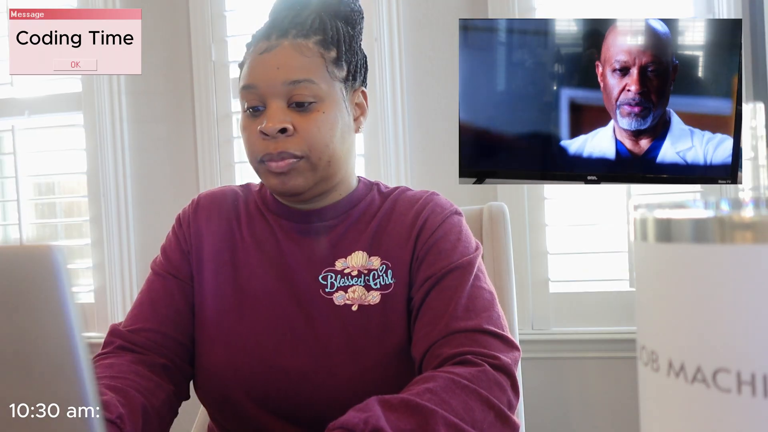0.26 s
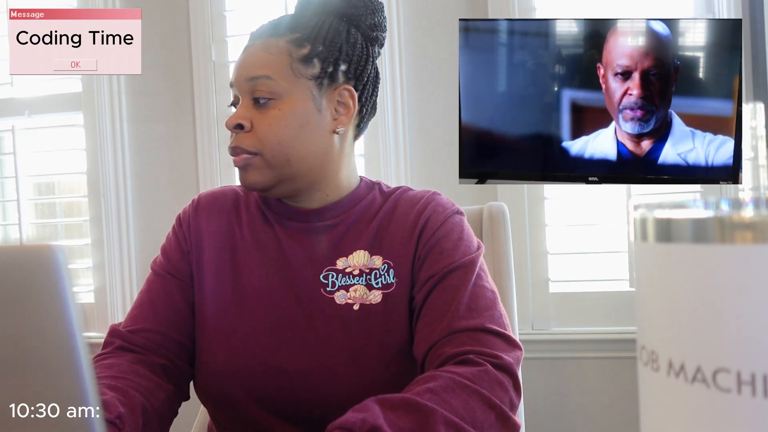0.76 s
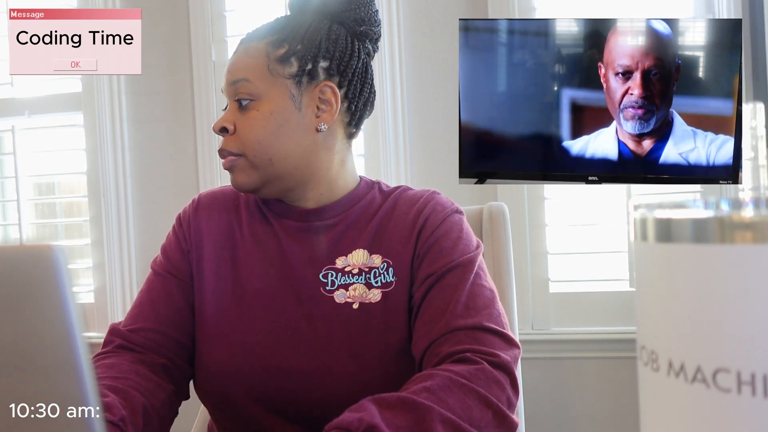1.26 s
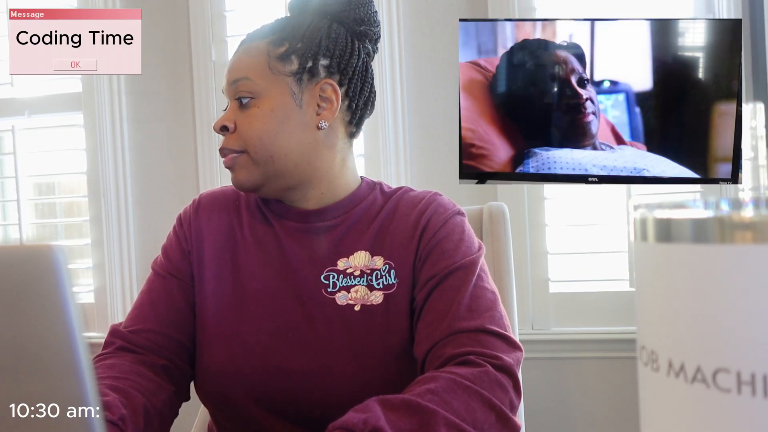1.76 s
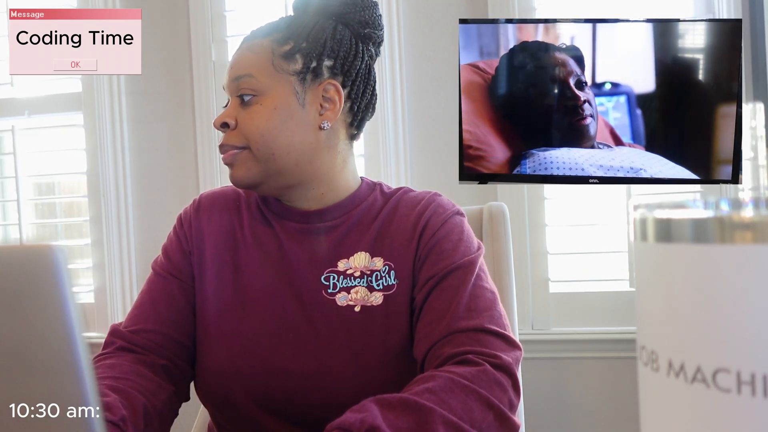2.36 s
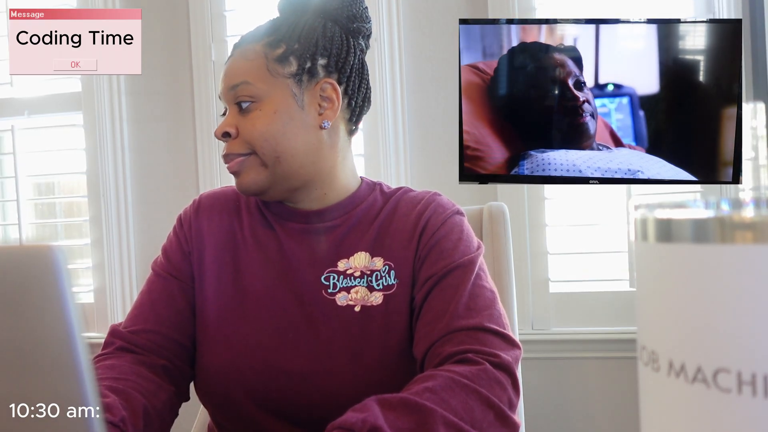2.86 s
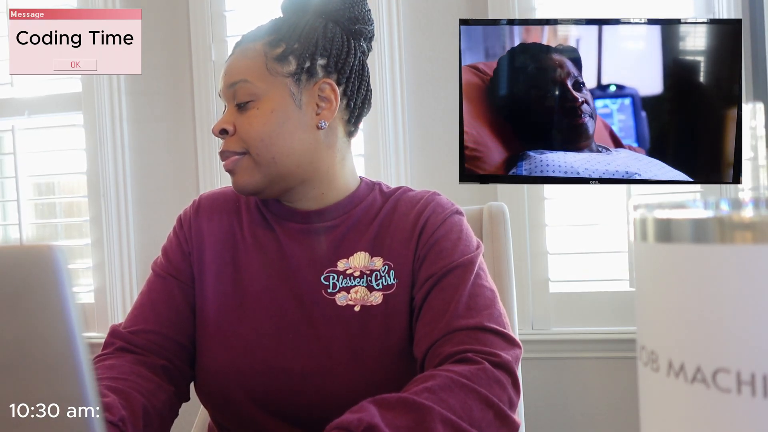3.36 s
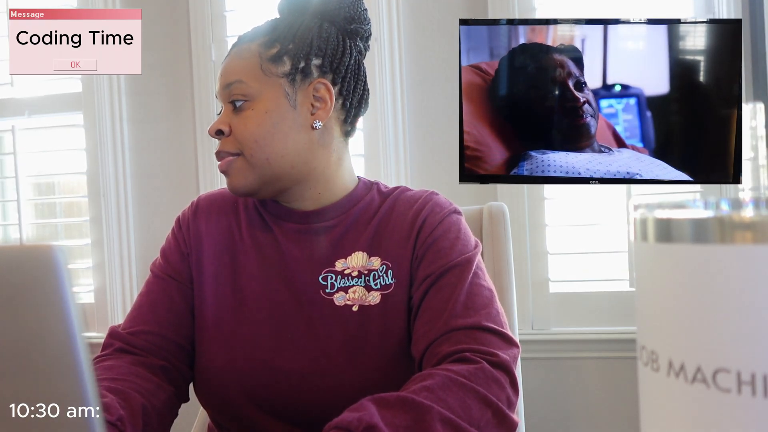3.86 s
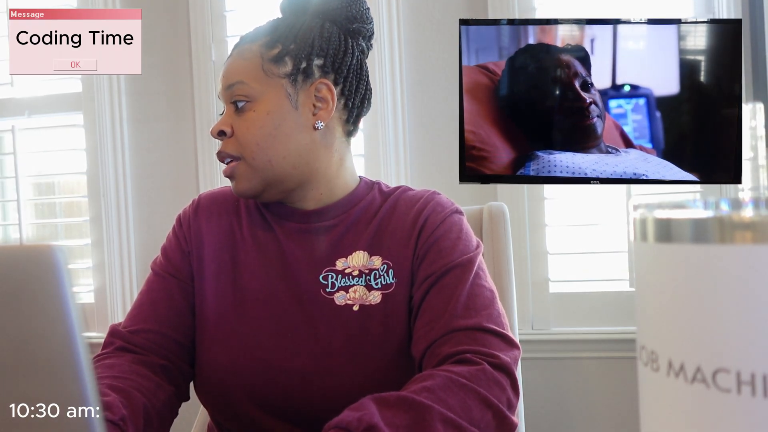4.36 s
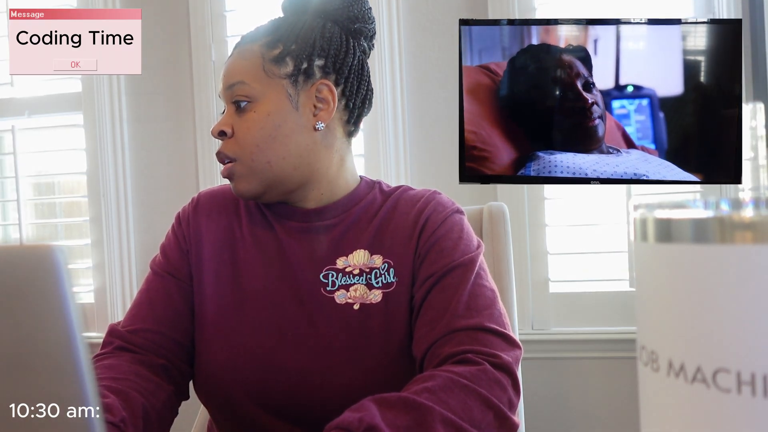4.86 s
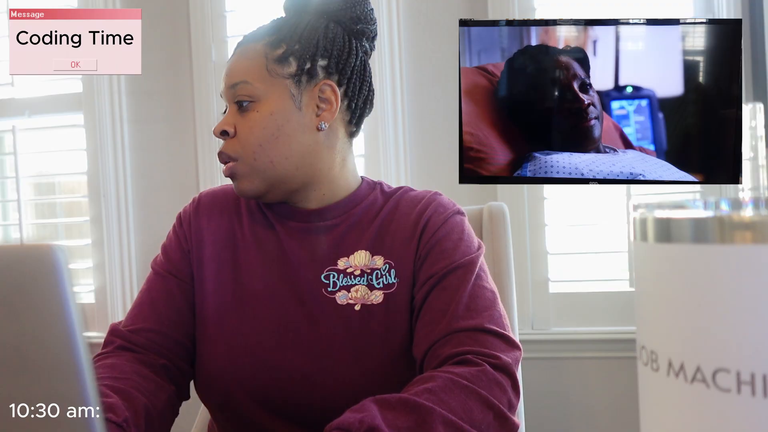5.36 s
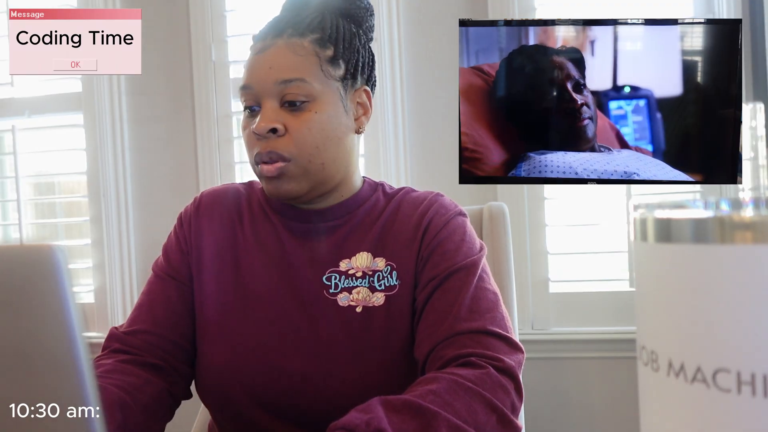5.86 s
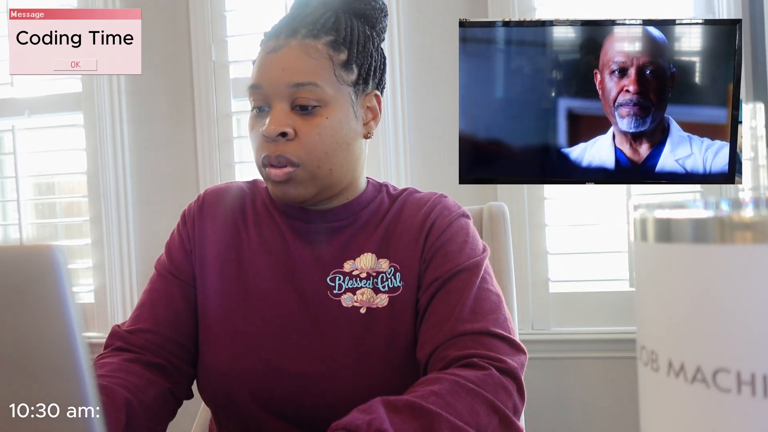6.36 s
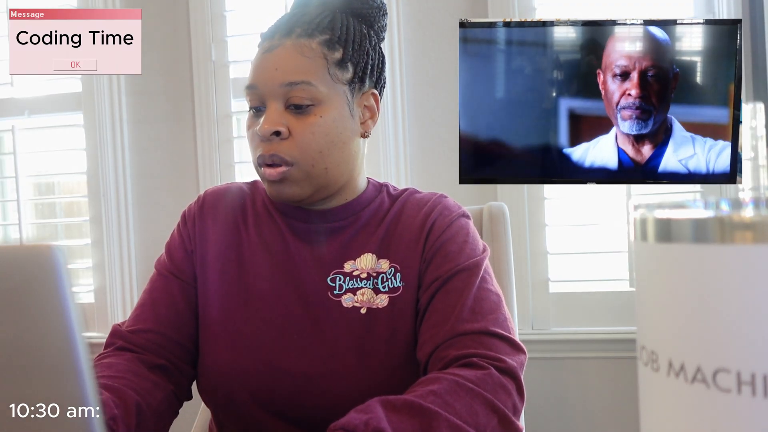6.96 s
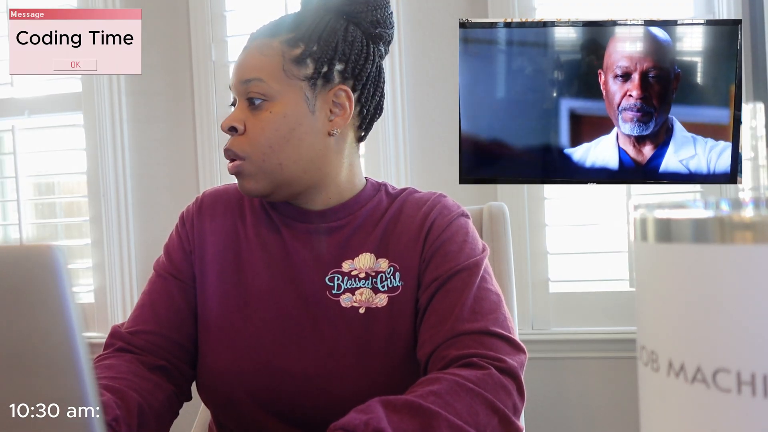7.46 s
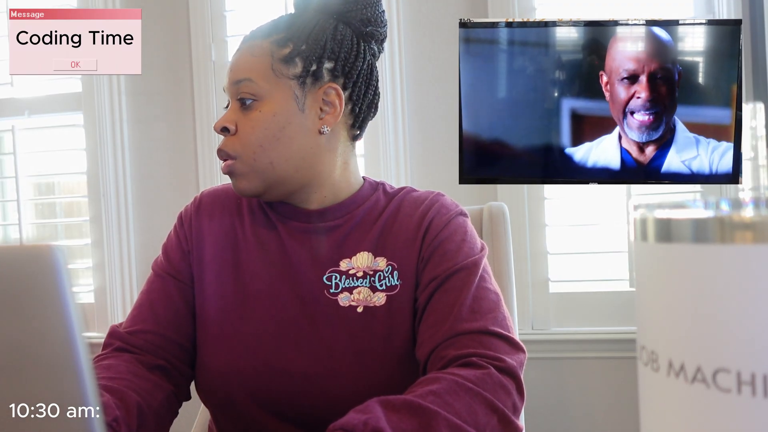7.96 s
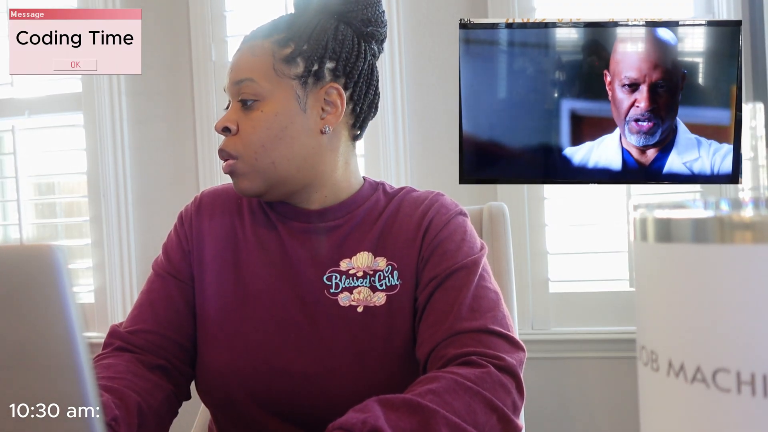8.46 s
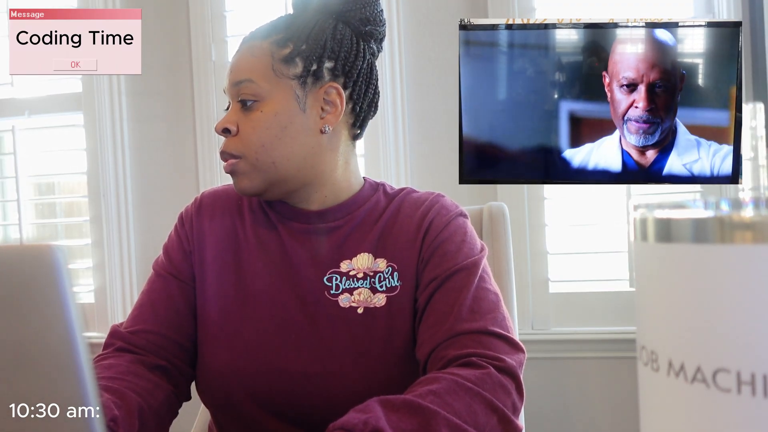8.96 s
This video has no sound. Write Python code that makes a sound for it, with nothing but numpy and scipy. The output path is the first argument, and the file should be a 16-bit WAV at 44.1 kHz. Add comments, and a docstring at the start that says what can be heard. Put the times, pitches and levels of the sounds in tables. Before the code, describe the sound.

Laptop typing, heard at short distance on a phone: short, dry, crisp taps with small low thuds from the case, each followed by a quick reflection off a near wall and a light room tail. Rapid bursts fill the first five seconds, strongest around the middle of that run. Afterwards come isolated strokes and pairs with longer gaps, then a slightly quicker handful. Soft airy hiss continues throughout.

```python
"""A quiet, hard-walled room: fingers type quick runs on a laptop keyboard, a little way from a phone.
Bright taps and dull knocks each start as a short rattle that rings the keycap, its hinge and the case.
A near wall returns them about 15 ms later, and the room carries them off in a tail of fading noise bands.
Under it all lies a soft fan hiss of shaped noise whose octave bands flicker slightly."""
import sys
import numpy as np
from scipy import signal
from scipy.fft import rfft, irfft, next_fast_len
from scipy.io import wavfile
from scipy.ndimage import uniform_filter1d

SR = 44100
rng = np.random.default_rng(int(sys.argv[2]) if len(sys.argv) > 2 else 0)


def dump(signal):
    """Clip the signal to [-1, 1] and save it as 16-bit WAV at the path in sys.argv[1]."""
    limited = np.clip(np.atleast_2d(signal).T, -1, 1)
    pcm = np.round(limited * 32767).astype(np.int16)
    wavfile.write(sys.argv[1], SR, pcm)


N = 406161

# stereo width of the typing, near and off the walls: (frequency [Hz], side minus mid [dB])
WIDTH = [(100, -18), (500, -11.5), (2000, -17), (4000, -10), (10000, -7.5)]


def contacts():
    """Fingers tap and keys land: rows of (time, level, case, hinge, cap Hz, hinge Hz, case Hz, top Hz, room dB)."""
    # bright taps of nail and keycap: (time [s], nominal peak [dB], case above cap [dB],
    # hinge above cap [dB], cap pitch [Hz], hinge pitch [Hz])
    taps = [(0.24, -32.0, -12, -5.5, 5100, 8200), (0.415, -28.5, -6, -5, 2040, 8100),
            (0.441, -31, -11, -7, 1500, 9050), (0.581, -23, -13, 5, 4500, 7800),
            (0.606, -25.5, -10.5, -10, 1980, 7750), (0.691, -28, -10, -5, 3350, 7850),
            (0.751, -16.5, -18, -1, 5660, 6550), (0.846, -25, -8.5, 1.5, 3020, 7700),
            (0.965, -18, -14, 8.5, 2930, 7850), (1.071, -23.5, -16, -9, 4030, 8200),
            (1.077, -23, -20, 5, 4120, 9250), (1.23, -12.5, -22, 1.5, 4400, 8100),
            (1.41, -23.5, -18, -6, 5300, 7400), (1.744, -18.5, -15.5, -1, 3900, 7600),
            (1.834, -21, -17, -5.5, 3900, 7550), (1.924, -18, -8.5, 5.5, 4650, 8350),
            (2.077, -26, -25, 4, 3370, 9300), (2.217, -16.5, -33, 6, 3960, 8200),
            (2.249, -18, -13.5, -2, 1610, 8400), (2.33, -12.5, -11.5, 7, 2600, 6900),
            (2.401, -22, -19, -6, 4860, 8100), (2.452, -21, -30.0, -2, 2600, 6270),
            (2.497, -18, -13, -0.5, 2340, 8300), (2.541, -27, -6.5, 0, 1460, 9700),
            (2.625, -16, -17, -4, 5800, 7200), (2.705, -25, -13, 5, 4240, 8000),
            (2.737, -23, -8.5, -2, 1770, 7950), (2.872, -23, 2, -12, 2670, 8400),
            (2.874, -15, -7.5, -10, 1830, 8700), (2.933, -12, -12, 10.5, 4070, 9100),
            (3.06, -19.5, -6, -0.5, 1450, 7550), (3.196, -15, -12.5, 2, 3730, 7040),
            (3.296, -24.5, -9.5, 0.5, 4130, 6450), (3.459, -29.5, -12.5, 2, 1523, 7800),
            (3.543, -27.5, -13.5, -5, 3980, 6230), (3.811, -13.5, -18, -2.5, 2360, 7700),
            (3.938, -30, -24, -5.0, 3900, 7960), (4.01, -20.5, -16, 0.5, 2920, 9100),
            (4.135, -23.5, -14, 6.5, 3980, 7860), (4.171, -16.5, -16, -0.5, 5950, 10300),
            (4.255, -23, -15, -1, 5400, 8200), (4.293, -13.5, -42, 7, 4400, 8300),
            (4.305, -21.5, -14, -20, 2030, 7800), (4.383, -13.5, -10, -1, 5400, 7350),
            (4.448, -33, -34.0, -5, 3260, 9000), (4.485, -12, -18.5, 6, 4340, 8860),
            (4.502, -22.5, -11, -13, 1720, 8850), (4.578, -15, -14, 2, 3900, 7840),
            (4.664, -23.5, -12, -2.5, 4900, 6300), (4.755, -23, -14, 0, 5500, 7550),
            (4.882, -27.5, -12.5, -5, 3660, 10100), (4.896, -22.5, -9, 10, 2100, 9200),
            (4.988, -35.5, -5.5, -2.5, 1640, 9100), (5.112, -29, -12, 4, 2300, 9000),
            (5.436, -34, -17, -9, 2150, 8500), (5.646, -34, -28, -11, 5650, 6200),
            (6.249, -20.5, -16.5, 0, 2020, 8200), (6.326, -28.5, -11.5, -11, 1560, 8500),
            (6.589, -26.5, -28, 2, 2170, 7500), (6.772, -26.5, -8, 3.5, 4200, 8050),
            (7.179, -39.5, -20, -8, 2050, 8700), (7.797, -25.5, -10, -2, 1810, 7800),
            (8.132, -38.5, -26, 0, 2050, 9500), (8.359, -23, -22, 4.5, 3300, 8500),
            (8.596, -38.5, -15.5, -7, 5440, 8750), (8.853, -23.5, -35, -4, 2900, 6640),
            (8.878, -28.5, -11, -2, 1650, 6270), (8.966, -24.5, -17, -2, 5660, 6400)]
    # dull knocks of keys landing on the case: (time [s], nominal peak [dB], case above cap [dB],
    # cap pitch [Hz], case pitch [Hz])
    knocks = [(0.003, -29, -31, 2580, 1160), (0.267, -30, -4, 2200, 930), (0.525, -35.5, 0, 2080, 905),
              (0.996, -25, -12.5, 2420, 1090), (1.099, -30.5, 2.5, 1400, 1030),
              (1.16, -35.5, -6.5, 2430, 1010), (1.241, -21, -20, 1580, 1300),
              (1.33, -28.5, -13, 2070, 1140), (1.557, -30.5, -12, 3400, 860),
              (2.013, -29.5, -13, 4200, 670), (2.096, -28.5, 2, 1630, 1020), (2.178, -35, 6, 2040, 1020),
              (2.307, -25, -14, 1540, 1120), (2.595, -22.5, -9, 2240, 1130), (2.953, -19, -5.5, 2560, 1070),
              (3.027, -23, 0, 1960, 980), (3.137, -32, 1, 1580, 900), (3.665, -32.5, 2, 1740, 1070),
              (3.681, -27.5, -10, 1830, 1080), (4.79, -25, -9.5, 1800, 1090),
              (4.919, -24.5, -2.5, 1590, 900), (5.136, -34.5, -4, 2050, 1100), (5.689, -38, -18, 1720, 680),
              (6.602, -23, -10.5, 1190, 930), (6.666, -33, -5, 3100, 870), (7.565, -29, -23, 3430, 1120),
              (7.844, -41, 13, 2130, 670), (8.205, -28, 0.5, 2130, 1070), (8.256, -26.5, -3.5, 1900, 1090),
              (8.376, -25.5, -2.5, 3320, 920), (8.45, -35.5, -9, 4280, 900),
              (8.706, -35.5, -15, 2500, 1230)]
    # the cap's ring dulls above the top frequency; the room share is what goes out to the walls
    tap_top_hz, tap_room_db = 9000, -1.5
    knock_top_hz, knock_room_db = 3670, -2
    knock_hinge_db, knock_hinge_hz = -13.5, 8300
    # the case pitch cycles through three values from tap to tap
    tap_case_hz = np.resize((1090, 1180, 1020), len(taps))
    rows = [(*tap, case_hz, tap_top_hz, tap_room_db) for tap, case_hz in zip(taps, tap_case_hz)]
    for s, peak_db, case_db, cap_hz, case_hz in knocks:
        rows.append((s, peak_db, case_db, knock_hinge_db, cap_hz, knock_hinge_hz,
                     case_hz, knock_top_hz, knock_room_db))
    return np.array(rows, float)


def keys(size=4096):
    """Rattles ring cap, case and hinge; gives the direct sound (mid, side) and the sends to the room."""
    # modes of the case, the lowest a faint ring of the desk beneath: (mean centre [Hz], width [Hz], mean level
    # [dB])
    case_modes = [(260, 45, -24), (507.5, 43, -5.5), (649, 66, -4), (896, 262, -3), (1155, 197, -2.5)]
    # modes of the deck that ring with the cap: (mean centre [Hz], width [Hz], mean level [dB])
    deck_modes = [(1714, 480, -3.5), (2436, 570, -2), (3820, 580, -0.5), (5240, 920, 0)]
    # modes of the hinge: (mean centre [Hz], width [Hz], mean level [dB])
    hinge_modes = [(7940, 1480, -11.5), (10250, 1700, -13), (13900, 690, -8)]
    # each contact lifts the modes near its own pitches; gains are heights over the plain modes
    cap_width_hz, cap_gain = 400, 1.54
    case_width_hz, case_gain = 154, 2.15
    hinge_width_hz, hinge_gain = 1340, 3.04
    crest_db = 10.5  # nominal peak over the loudest two milliseconds
    sends = 6  # the contacts take turns among these, so the tails vary
    columns = contacts().T[:, :, None]
    s, peak_db, case_db, hinge_db, cap_hz, hinge_hz, case_hz, top_hz, room_db = columns
    count, hz = len(s), bins(size)
    lead = int(.002 * SR)  # room ahead of the contact for the rings' responses
    rattle = rattles(count, size) * np.exp(-2j * np.pi * hz * lead / SR)

    cap = abs(1 + cap_gain * ring(hz, cap_hz, cap_width_hz)) * body(deck_modes, hz, count, dense=True)
    cap = cap / (1 + (hz / top_hz) ** 2)
    case = (1 + case_gain * ring(hz, case_hz, case_width_hz)) * body(case_modes, hz, count)
    hinge = abs(1 + hinge_gain * ring(hz, hinge_hz, hinge_width_hz))
    hinge = hinge * body(hinge_modes, hz, count, dense=True)

    sound = 0
    for response, db, span_ms in ((case, case_db, 8), (cap, 0, 3), (hinge, hinge_db, 3)):
        part = irfft(rattle * response)
        # the parts are balanced by their power over the loudest few milliseconds
        loudest = uniform_filter1d(part ** 2, int(span_ms * SR / 1000)).max(axis=2, keepdims=True)
        # the side follows the level of the mid
        sound = sound + part * undb(db) / np.sqrt(loudest[[0, 0, 2]])
    loudest = uniform_filter1d(sound[0] ** 2, size=88).max(axis=1, keepdims=True)
    sound *= undb(peak_db - crest_db) / np.sqrt(loudest)
    sound[2] *= undb(room_db)

    direct, send = np.zeros((2, N + size)), np.zeros((sends, N + size))
    # the chatter starts 1 ms ahead of the listed time
    starts = np.maximum(((s[:, 0] - .001) * SR).astype(int) - lead, 0)
    for k, at in enumerate(starts):
        direct[:, at:at + size] += sound[:2, k]
        send[k % sends, at:at + size] += sound[2, k]
    return direct[:, :N], send[:, :N]


def rattles(count, size):
    """Plastic chatters for a moment, then stops dead: spectra of mid, side and room send."""
    hold_ms, fade_ms = 1.8, 1.5
    rise_span_ms, snap_span_ms = 2.27, 0.99  # random spread, on top of the shortest times
    snap_db = 4
    ms = np.arange(size) * 1000 / SR
    haste = rng.random((count, 2))
    rise = np.minimum(ms / (0.3 + rise_span_ms * haste[:, :1]), 1)
    shape = rise * np.exp(-np.maximum(ms - hold_ms, 0) / fade_ms)
    chatter = shape * grains((3, count, size))
    # one hard snap is added to the mid early in the chatter
    snap_at = ((.4 + snap_span_ms * haste[:, 1]) * SR / 1000).astype(int)
    chatter[0, np.arange(count), snap_at] += undb(snap_db)
    rattle = rfft(chatter)
    # hard contacts excite all pitches about evenly
    rattle /= np.sqrt(uniform_filter1d(abs(rattle) ** 2, size=48))
    rattle[1] *= undb(curve(WIDTH, bins(size)))
    # the walls hear all directions at once, which evens out the colour: the send is a flat click
    rattle[2] = 1
    return rattle


def grains(shape):
    """Noise of uneven tiny impacts, rms 1."""
    grain_db = 5.5  # unevenness
    x = rng.standard_normal(shape) * undb(grain_db * rng.standard_normal(shape))
    return x / np.sqrt(np.mean(x ** 2))


def body(modes, hz, count, dense=False):
    """Each contact drives every mode with its own random strength and slightly shifted pitch."""
    scatter_db, pitch_scatter = 3.5, 0.062  # spread among contacts; pitch as a share of the centre
    chance = rng.standard_normal((count, len(modes)))
    shift = 1 + pitch_scatter * rng.standard_normal((count, len(modes)))
    rings = []
    for k, (centre_hz, width_hz, db) in enumerate(modes):
        strength = undb(db + scatter_db * chance[:, [k]])
        # neighbours swing against each other
        rings.append((-1) ** k * strength * ring(hz, centre_hz * shift[:, [k]], width_hz))
    if dense:
        # dense treble modes overlap so much that powers add and no gaps open between them
        return np.sqrt(np.sum(np.abs(rings) ** 2, axis=0))
    return sum(rings)


def ring(hz, centre_hz, width_hz):
    """Response of one damped resonance, gain 1 at its centre."""
    return 1j * hz * width_hz / (centre_hz ** 2 - hz ** 2 + 1j * hz * width_hz)


def room(size=16384):
    """Echo pattern (mid, side): scattered early returns, then a tail that dies band by band."""
    # early returns from the near walls: (delay [ms], spread [ms], level [dB])
    returns = [(11.5, 3.5, -22.5), (16, 6.9, -9)]
    # tail of the room: (band centre [Hz], decay by 60 dB [s], level [dB])
    tail_bands = [(296, 0.88, -17), (1070, 0.34, -12), (2400, 1, -26), (8250, 0.31, -13.5),
                  (13800, 0.4, -20)]
    lump_ms, lump_db = 1.5, 1.8
    ms, hz = np.arange(size) * 1000 / SR, bins(size)
    # echoes arrive in clumps
    clumps = undb(lump_db * walk(1000 / lump_ms)[:size])
    noise = rng.standard_normal((2, size)) / np.sqrt(SR / 1000) * clumps
    early = 0
    for delay_ms, spread_ms, db in returns:
        early = early + undb(db) * np.exp(-.5 * ((ms - delay_ms) / spread_ms) ** 2) / np.sqrt(spread_ms)
    echoes = early * noise
    # the tail builds up once the first wall has answered
    onset = np.clip((ms - 9.5) / 5, 0, 1)
    centres = [f for f, _, _ in tail_bands]
    for k, (_, t60, db) in enumerate(tail_bands):
        # each band crossfades into its neighbours
        band = curve(list(zip(centres, np.eye(len(tail_bands))[k])), hz)
        decay = undb(db - 60 * ms / 1000 / t60)
        echoes = echoes + irfft(rfft(noise) * band) * decay * onset
    echoes[1] = irfft(rfft(echoes[1]) * undb(curve(WIDTH, hz)))
    return echoes


def hiss():
    """Soft fan and air hiss (mid, side): shaped noise whose octave bands flicker a little, each alone."""
    # colour of the hiss: (frequency [Hz], relative density [dB per Hz])
    colour = [(30, -35.5), (250, -15), (800, -6.5), (2200, 2), (3100, -3.5), (3900, -2.5), (6300, -14),
              (15500, -20.5), (16200, -40)]
    mid_db, side_db = -59, -8  # mid rms, and side relative to the mid
    size = next_fast_len(N)
    hz, out = bins(size), 0
    noise = rfft(rng.standard_normal((2, size))) * undb(curve(colour, hz))
    for octave in np.arange(5, 15):  # band centre is 2 ** octave Hz
        band = np.clip(1 - abs(np.log2(np.maximum(hz, 1)) - octave), 0, 1)
        flicker = undb(1.1 * walk(4))
        out = out + irfft(noise * band, size)[:, :N] * flicker
    out = out * undb([[0], [side_db]])
    return out * undb(mid_db) / np.sqrt(np.mean(out[0] ** 2))


def walk(rate):
    """Random levels held 1 / rate s and slewed twice; spread near 1."""
    k = int(SR / rate)
    steps = np.repeat(rng.standard_normal(N // k + 1), k)
    return 1.3 * uniform_filter1d(uniform_filter1d(steps, k), k)[:N]


def undb(db):
    """Amplitude of a level in dB."""
    return 10 ** (np.asarray(db) / 20)


def curve(points, hz):
    """A (frequency [Hz], value) table read on a log-frequency axis."""
    f, v = np.transpose(points)
    return np.interp(np.log(np.maximum(hz, 1)), np.log(f), v)


def bins(size):
    """Frequencies of a real transform, in Hz."""
    return np.arange(size // 2 + 1) * SR / size


def scene():
    """Typing, direct and off the walls, over the hiss; mid and side become left and right."""
    direct, sends = keys()
    # every send gets an echo pattern of its own
    wet = sum(signal.fftconvolve(send[None], room(), axes=1)[:, :N] for send in sends)
    # below about 200 Hz the typing falls away
    bass_cut = signal.butter(2, 204, "high", fs=SR, output="sos")
    typing = signal.sosfilt(bass_cut, direct + wet)
    mid, side = typing + hiss()
    return np.array([mid + side, mid - side])


def record(dry):
    """The phone cuts the top steeply."""
    top_hz = 16300
    return signal.sosfilt(signal.ellip(8, .2, 70, top_hz, fs=SR, output="sos"), dry)


dry = scene()
out = record(dry)
dump(out)
```